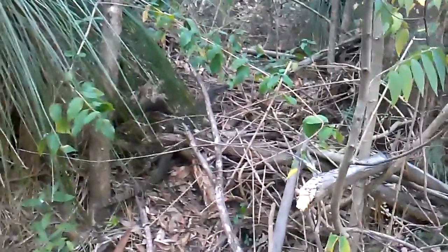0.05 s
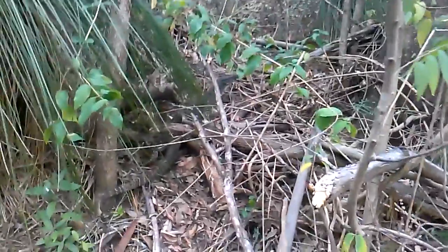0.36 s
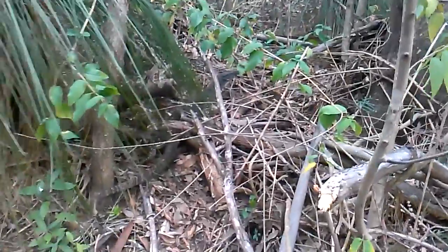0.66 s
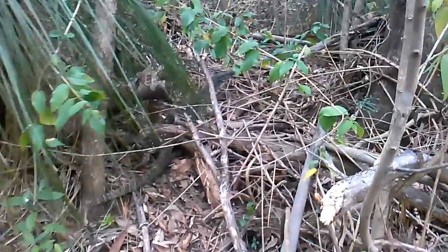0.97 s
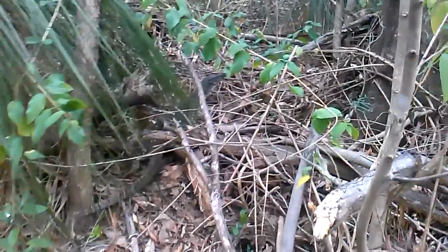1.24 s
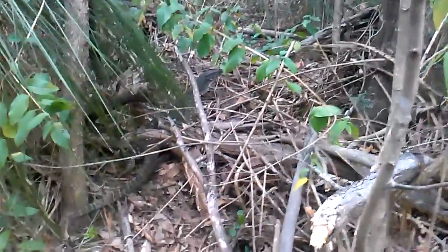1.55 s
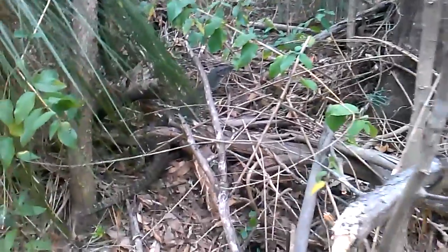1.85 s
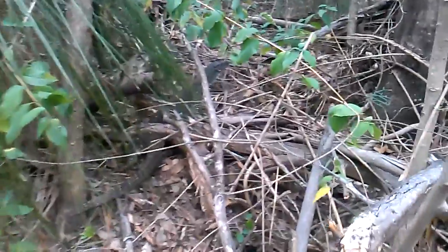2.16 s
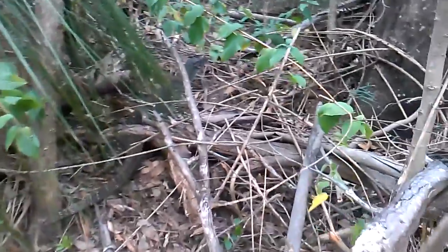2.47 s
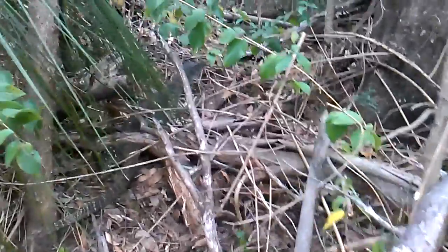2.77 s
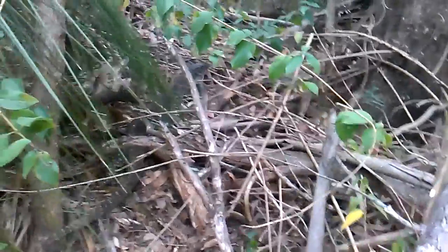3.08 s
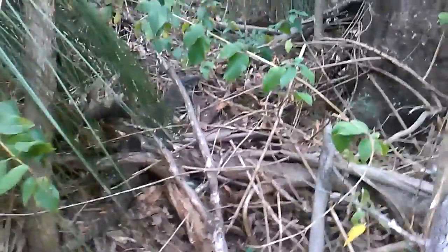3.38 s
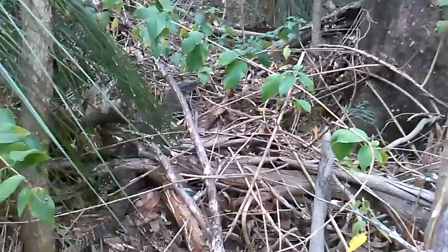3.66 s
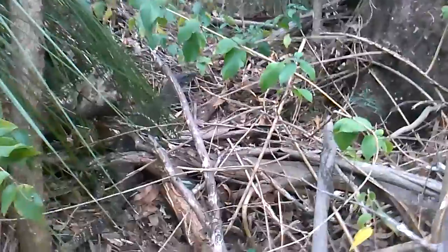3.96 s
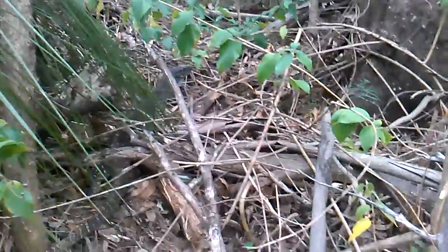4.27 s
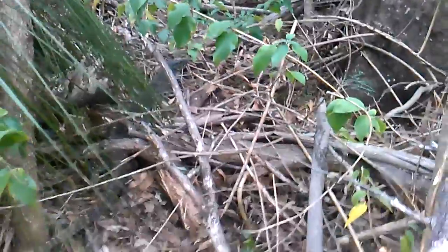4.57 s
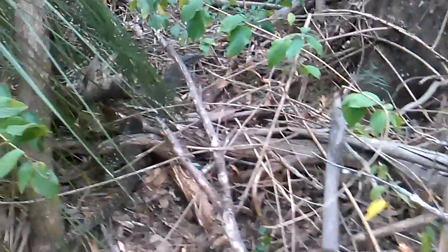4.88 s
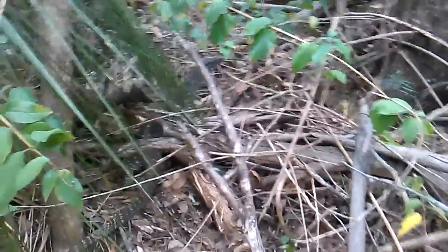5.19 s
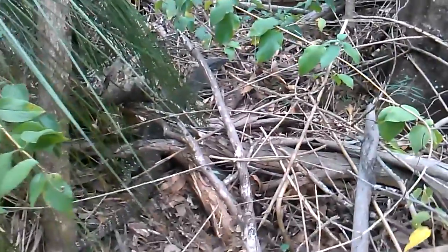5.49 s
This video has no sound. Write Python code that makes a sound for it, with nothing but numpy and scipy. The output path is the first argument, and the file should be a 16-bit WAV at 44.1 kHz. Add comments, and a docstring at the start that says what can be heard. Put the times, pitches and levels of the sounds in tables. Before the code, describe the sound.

An animal steps and scratches through dry forest litter, making crisp leaf crackles, small twig snaps and brief swishing scrapes. After one early rustle and a lull, the crackling grows busy, then gives way to two stronger raking strokes. Throughout, birds near and far repeat short, high pings on almost one pitch, echoing among the trees. A hand-held microphone adds a very faint low rumble.

```python
"""Dry leaves crackle and twigs snap as an animal steps and scratches through forest litter.
Each brittle fracture is an impulse that excites damped resonances, high in a leaf and low in a twig.
Birds, probably bell miners, ping on nearly one pitch, and reflections from the trunks prolong each call;
another bird squeaks twice. Air and handling rumble faintly on the hand-held microphone,
and a noise suppressor lowers the quiet gaps."""
import sys
import numpy as np
from scipy import signal
from scipy.fft import rfft, irfft, next_fast_len
from scipy.io import wavfile
from scipy.ndimage import uniform_filter1d

SR = 44100
rng = np.random.default_rng(int(sys.argv[2]) if len(sys.argv) > 2 else 0)


def to_wav(s):
    """Save 16-bit WAV."""
    ch = np.atleast_2d(s).T  # columns
    pcm = np.round(np.clip(ch, -1, 1) * 32767)  # PCM
    wavfile.write(sys.argv[1], SR, pcm.astype(np.int16))


N = 252693


# motion of the foot: t/s, raking share of the power (0 = separate crackles, 1 = one dense swish)
RAKE_SHARE = [(.45, 0.11), (.72, 0.69), (1.0, 0.27), (2.95, 0.056), (3.3, 0.61), (5.0, 0.95), (5.45, 0.6)]
# filters for trodden leaves, raked leaves and the twigs below: f/Hz, gain/dB
CRACKLE_SPECTRUM = [(400, -44), (1500, -17.5), (3500, -4.5), (5400, -3.5), (6800, -10), (8200, 1.5),
                    (9500, -11), (11200, -5.5), (13500, -8), (16000, -16.5)]
SWISH_SPECTRUM = [(400, -38), (1500, -14.5), (2600, -22), (3700, -7), (5200, -10), (6200, -2), (7500, -3),
                  (9200, -13), (11200, -14.5), (13500, -9.5), (16000, -15.5)]
TWIG_SPECTRUM = [(80, -31), (230, -6.5), (800, -1), (1700, -3), (2600, -8.5), (4000, -15), (9000, -32)]

def litter():
    """Superposition of impulses: treading cracks single leaves, raking slides hundreds, twigs creak."""
    leaf_gain, twig_gain = rustle_gains()
    rake = curve(RAKE_SHARE)
    clumps = amp(2.3 * wander(N, rate_hz=49))  # leaves give way in bunches
    crackle = fractures(per_s=1700, spread_db=7, low_hz=2800, high_hz=13100, q=1.7, tear_s=0.00079)
    swish = fractures(per_s=3800, spread_db=3.5, low_hz=2760, high_hz=14700, q=1.7, tear_s=0.0012)
    twigs = fractures(per_s=800, spread_db=6, low_hz=194, high_hz=2680, q=2.4, tear_s=0.0021)
    crackle = scatter(colour(crackle, CRACKLE_SPECTRUM) * clumps, wet_db=-6.5, t60=0.068)
    swish = colour(swish, SWISH_SPECTRUM) * clumps
    twigs = scatter(colour(twigs, TWIG_SPECTRUM) * clumps, wet_db=-3, t60=0.27)
    leaves = np.sqrt(1 - rake) * steady(crackle) + np.sqrt(rake) * steady(swish)
    return leaf_gain * leaves + twig_gain * steady(twigs)


# steps and scrapes, and two stretches of faint hiss that swell with the bird calls (0.477 s, 1.223 s):
# t/s, rise/s, hold/s, leaf level/dB, twig level re leaves/dB
RUSTLE_SWELLS = [(0.068, 0.078, 0.23, -60.5, -9), (0.477, 0.032, 0.23, -56.5, -12.5),
                 (0.658, 0.062, 0.046, -31.5, -17.5), (0.784, 0.024, 0.12, -44, -4),
                 (0.956, 0.045, 0.0077, -54.5, 2.5), (1.064, 0.014, 0.0076, -52, 1),
                 (1.223, 0.013, 0.52, -62, -3), (1.616, 0.16, 0.0053, -49.5, -11),
                 (1.996, 0.086, 0.014, -38, -14.5), (2.143, 0.044, 0.15, -42.5, -11),
                 (2.346, 0.019, 0.29, -32.5, -14), (2.676, 0.019, 0.26, -33, -15.5),
                 (3.017, 0.026, 0.067, -43, -15), (3.127, 0.027, 0.016, -36, -18.5),
                 (3.595, 0.031, 0.11, -28, -13), (3.662, 0.034, 0.041, -27, -14.5),
                 (3.736, 0.067, 0.019, -22, -14.5), (3.856, 0.041, 0.042, -39.5, -15),
                 (4.169, 0.019, 0.12, -48.5, -17), (4.514, 0.046, 0.03, -40, -16),
                 (4.594, 0.089, 0.052, -30.5, -16), (4.742, 0.085, 0.13, -34.5, -18),
                 (4.961, 0.054, 0.065, -24.5, -12), (5.116, 0.018, 0.11, -47.5, -15),
                 (5.367, 0.013, 0.29, -39.5, -11)]
# faint rustle between the steps: t/s, leaf level/dB
RESTING_RUSTLE = [(0, -67), (.45, -101), (1.2, -80.5), (1.8, -66.5), (3.3, -53.5), (4.45, -63.5),
                  (5.73, -65)]

def rustle_gains():
    """Incoherent addition: overlapping swells sum in power. Returns the gains of leaves and twigs."""
    t = np.arange(SR) / SR
    leaf_power = amp(curve(RESTING_RUSTLE)) ** 2
    twig_power = leaf_power * amp(-11) ** 2
    for start, rise, hold, leaf_db, twig_db in RUSTLE_SWELLS:
        gain = swell_envelope(t, rise, hold)
        add(leaf_power, start, (amp(leaf_db) * gain) ** 2)
        add(twig_power, start, (amp(leaf_db + twig_db) * gain) ** 2)
    return np.sqrt(leaf_power), np.sqrt(twig_power)


def swell_envelope(t, rise, hold, swell_db=12.5, release_db_per_s=282, settle_db_per_s=67.5):
    """Exponential growth and decay: in a step, the weight comes down, holds and lifts."""
    swell = amp(swell_db * (np.clip(t / rise, 0, 1) - 1)) * np.clip(t / 0.02, 0, 1)
    released_s = np.maximum(t - rise - hold, 0)
    settling_db = -19 - settle_db_per_s * released_s  # after a step, bent leaves go on springing back
    return swell * amp(np.maximum(-release_db_per_s * released_s, settling_db))


def fractures(per_s, spread_db, low_hz, high_hz, q, tear_s, fragments=10):
    """Poisson process: tiny tears, most weak and a few strong, each ring one resonant fragment."""
    onsets = rng.random(N) < per_s / SR
    clicks = onsets * amp(spread_db * np.minimum(rng.exponential(1, N), 3.5))
    fragment = rng.integers(0, fragments, N)
    fibres, out = rng.standard_normal(N), np.zeros(N)
    decay = np.exp(-1 / (tear_s * SR))
    for k, hz in enumerate(np.linspace(low_hz, high_hz, fragments)):
        tears = signal.lfilter([1], [1, -decay], clicks * (fragment == k) + 1e-12)
        out += ring(tears * fibres, hz, width_hz=hz / q) * np.sqrt(hz / q)
    return out


# the clearest breaks of leaves and twigs: t/s, relative crack level/dB, relative knock level/dB
BREAKS = [(0.164, -35, -56), (0.272, -49, -39.5), (.303, -34.5, -42.5), (0.3624, -44, -36),
          (0.787, -24, -36.5), (0.847, -16.5, -60), (0.886, -35, -34), (.907, -23, -36.5),
          (1.001, -35, -48), (1.0723, -45, -39), (1.094, -38, -68), (1.627, -40, -65), (1.655, -47, -41),
          (1.769, -26.5, -53), (1.863, -39.5, -75), (2.01, -32, -52), (2.060, -24.5, -38),
          (2.068, -18.5, -33.5), (2.088, -20.5, -31), (2.227, -29, -45), (2.343, -25, -40),
          (2.37, -25, -26.5), (2.373, -29, -32), (2.385, -15, -25), (2.405, -12, -31), (2.478, -18, -30.5),
          (2.489, -21, -43), (2.499, -19.5, -34), (2.537, -39, -30), (2.555, -25, -47), (2.599, -27.5, -48),
          (2.628, -29, -28), (2.704, -23, -38), (2.71, -20, -30.5), (2.718, -28, -37), (2.774, -17, -30.5),
          (2.8085, -16.5, -32), (2.814, -18.5, -32), (2.894, -17, -28), (2.913, -22.5, -49),
          (2.938, -21.5, -54), (2.947, -18.5, -28.5), (3.018, -43, -34.5), (3.108, -27.5, -54),
          (3.427, -30, -52), (3.656, -29, -26.5), (3.741, -16, -27.5), (3.773, -17, -46), (3.807, -19, -41),
          (3.905, -24.5, -38.5), (3.928, -25.5, -33.5), (4.086, -33, -69), (4.262, -37, -57),
          (4.557, -27.5, -46), (5.035, -19, -25), (5.067, -25, -38), (5.12, -28, -35), (5.172, -23.5, -47),
          (5.479, -26, -43), (5.503, -33, -44), (5.525, -33, -42.5)]
# resonance of what breaks, high for thin leaves and lower for thicker stuff: t/s, f/Hz
CRACK_RESONANCE = [(2.35, 8200), (2.75, 4750), (3.1, 5750), (5.2, 8200)]
# modes of a knocked twig and the ground under it: f/Hz, bandwidth/Hz, relative level/dB
WOOD_MODES = [(334, 350, -7), (960, 300, -1.5), (1525, 240, 3.5)]
LEAF_TEAR_S, LEAF_HZ = 0.00064, 8200  # decay time of a thin leaf's tear, and its resonance

def snaps(size=1200):
    """Impulse excitation of modes: tearing fibres ring a leaf high and briefly, a twig low and hollow."""
    t, out = np.arange(size) / SR, np.zeros(N)
    for start, crack_db, knock_db in BREAKS:
        fibres, wood = rng.standard_normal((2, size))
        leaf_size, twig_size = rng.standard_normal(2)
        hz = np.interp(start, *np.transpose(CRACK_RESONANCE)) * np.exp(-0.04 * leaf_size)
        tear_s = LEAF_TEAR_S * (LEAF_HZ / hz) ** 2  # lower-ringing stuff tears longer
        burst = np.diff(fibres * np.exp(-t / tear_s), prepend=0)
        crack = unit(ring(burst, hz, width_hz=770))
        crack += 0.5 * unit(ring(burst, 13600, width_hz=9200))
        crack += 0.44 * unit(ring(burst, 4450, width_hz=1200))
        push = (t == 0) + 0.14 * wood * np.exp(-t / 0.002)
        knock = sum(amp(db) * unit(ring(push, mode_hz * np.exp(-0.12 * twig_size), width_hz))
                    for mode_hz, width_hz, db in WOOD_MODES)
        add(out, start, amp(crack_db - 13) * unit(crack) + amp(knock_db - 12.5) * unit(knock))
    return scatter(out, wet_db=-8.5, t60=0.13)


def scatter(x, wet_db, t60, size=6000, count=5):
    """Early reflections: ground and stems return a short smear by paths that shift as the animal moves."""
    t = np.arange(size) / SR
    tails = rng.standard_normal((count, size)) * amp(-60 * t / t60) * (t > 0.001)
    weights = np.array([wander(N, rate_hz=21) for _ in tails])
    weights /= np.linalg.norm(weights, axis=0)
    echoes = sum(signal.oaconvolve(x * weight, tail / np.linalg.norm(tail))[:N]
                 for weight, tail in zip(weights, tails))
    return x + amp(wet_db) * echoes


# near calls: t/s, level/dB, starting f/Hz, fall/Hz, rasp share (0-1), upward reach of the rasp/Hz,
# relative level of the second harmonic/dB and of the third/dB
NEAR_CHIRPS = [(0.478, -34, 2870, 20.5, 0.14, 247, -26, -13), (.560, -22, 2889, 30, 0.2, 420, -15, -15.5),
               (1.272, -25.5, 2835, 19, 0.53, 112, -23, -19.5),
               (2.019, -28.5, 2983, 38, 0.22, 515, -23, -15.5),
               (2.054, -20.5, 2973, 162, 0.08, 165, -23.5, -20.5),
               (5.461, -39, 2945, 94, 0.53, 154, -33, -36)]
# pure pings: far calls, and the ringing echo of a near call (0.77 s): t/s, level/dB, f/Hz
PURE_PINGS = [(.092, -60, 2815), (.77, -44, 2860), (1.472, -39, 2840), (1.68, -46, 2890),
              (1.98, -41.5, 2965), (2.175, -36, 2850), (2.452, -31.5, 2870), (2.58, -42, 2865),
              (2.895, -41, 2860), (3.44, -47, 2845), (3.46, -48, 2915), (3.88, -48, 2850),
              (4.025, -50, 2828), (4.18, -55, 2835), (4.272, -49, 2950), (4.365, -52, 2855),
              (4.476, -37.5, 2865), (5.52, -45, 2885), (5.62, -48, 2870)]
# thin rising calls of another bird: t/s, duration/s, level/dB, first f/Hz, last f/Hz
RISING_SQUEAKS = [(0.603, 0.039, -49, 1390, 1800), (4.275, 0.07, -55.5, 595, 721)]

def birds():
    """Direct and reverberant sound: the pings carry a larger share of forest echo than the near calls."""
    near, pings = np.zeros((2, N))
    for start, *call in NEAR_CHIRPS:
        add(near, start, chirp(*call))
    for start, *tone in PURE_PINGS:
        add(pings, start, ping(*tone))
    for start, *call in RISING_SQUEAKS:
        add(near, start, squeak(*call))
    return forest(near, wet_db=-7.5) + forest(pings, wet_db=-3.5)


def chirp(level_db, first_hz, fall_hz, rasp_share, reach_hz, second_db, third_db, size=8192):
    """Beating of two voices: one holds a clean sagging note, the other rasps down near it and clears."""
    length_s, waver_hz, beat_hz = 0.0701, 15.5, 91.2
    progress = np.linspace(0, 1, int(length_s * SR))
    low_hz = first_hz - fall_hz * progress + waver_hz * wander(size, rate_hz=133)[:len(progress)]
    high_hz = low_hz + beat_hz + reach_hz * (1 - progress) ** 4
    low, high = phasor(low_hz), phasor(high_hz)
    roughness = (1 - progress) * flutter(size, rate_hz=150)[:len(progress)]
    clean, rasp = 1 - rasp_share, rasp_share * (roughness + np.sqrt(progress))
    swell = abs(np.sin(np.pi * progress))
    fundamentals = clean * low * swell + rasp * high * swell ** 0.62
    overtones = sum(amp(db) * (clean * low ** k + rasp * high ** k)
                    for k, db in [(2, second_db), (3, third_db)])
    brightness = np.sqrt(1 - progress)
    return amp(level_db) * np.sqrt(2) * (fundamentals + overtones * swell * brightness).real


def ping(level_db, hz, length_s=0.071, fall_hz=31.8, size=8192):
    """Multipath fading: of a far call or an echo, only the fundamental arrives, wavering through foliage."""
    progress = np.linspace(0, 1, int(length_s * SR))
    fading = 1 + 0.4 * flutter(size, rate_hz=55)[:len(progress)]
    note = phasor(hz + fall_hz * (0.5 - progress))
    swell = abs(np.sin(np.pi * progress)) ** 0.36
    return amp(level_db) * unit((note * fading).real) * swell


def squeak(length_s, level_db, first_hz, last_hz, formant_hz=4280, jitter=0.006):
    """Formant filtering: of a scratchy upward glide, only the harmonics near one resonance carry."""
    count = int(length_s * SR)
    hz = np.linspace(first_hz, last_hz, count) * (1 + jitter * wander(count, rate_hz=300))
    phase = 2 * np.pi * np.cumsum(hz) / SR
    voice = sum(np.sin(k * phase) / k / (1 + (2 * np.log2(k * hz / formant_hz)) ** 4)
                for k in range(1, 12))
    return amp(level_db) * unit(voice * np.hanning(count))


# reverberation time among the trees: f/Hz, T60/s
REVERB_TIME = [(2900, 0.93), (12000, 0.29)]

def forest(x, wet_db):
    """Reverberation: echoes from trunks and foliage shimmer as each band decays at its own rate."""
    reflections = rng.standard_normal(SR) * (rng.random(SR) < 2500 / SR)
    reflections *= np.arange(SR) > 0.012 * SR
    hz, t, bands = signal.stft(reflections, SR, nperseg=256)
    bands *= (hz[:, None] / 2900) ** 1.86  # leaves throw back short waves best
    bands *= amp(-60 * t / at_frequency(REVERB_TIME, hz)[:, None])
    tail = signal.istft(bands, SR, nperseg=256)[1]
    power = abs(rfft(tail, SR)) ** 2
    gain_at_pings = np.sqrt(power[2780:2980].mean())  # bins of 1 Hz
    echoes = signal.fftconvolve(x, tail)[:N] / gain_at_pings
    shimmer = 0.85 + 0.5 * flutter(N, rate_hz=40)
    return x + amp(wet_db) * (signal.hilbert(echoes, next_fast_len(N))[:N] * shimmer).real


# handling noise: f/Hz, relative level/dB
HANDLING_SPECTRUM = [(30, 0.5), (65, -8), (200, -16.5), (500, -25), (3000, -48.5)]
# puffs of air on the microphone: t/s, duration/s, level/dB
AIR_PUFFS = [(3.342, 0.33, -39.5), (4.132, 0.12, -41.5)]

def rumble():
    """Low-frequency noise: uneven handling and the eddies of two soft puffs of air on the microphone."""
    handling_db = -51.5 + 0.87 * wander(N, rate_hz=25)
    out = amp(handling_db) * unit(colour(rng.standard_normal(N), HANDLING_SPECTRUM))
    eddies = ring(rng.standard_normal(N), 28, width_hz=18)
    eddies = signal.sosfilt(signal.butter(2, 70, fs=SR, output="sos"), eddies)
    for start, length_s, db in AIR_PUFFS:
        count = int(length_s * SR)
        puff = eddies[int(start) * SR:][:count] * np.hanning(count)
        add(out, start, amp(db) * unit(puff))
    return out


def colour(x, spectrum, size=4096):
    """Minimum-phase filtering: shapes the spectrum causally, so clicks keep their sharp fronts."""
    hz = abs(np.fft.fftfreq(size, 1 / SR))
    log_gain = np.log(amp(at_frequency(spectrum, hz)))
    taps = np.fft.ifft(np.exp(np.conj(signal.hilbert(log_gain)))).real
    return signal.oaconvolve(x, taps[:size // 2])[:len(x)]


def ring(x, hz, width_hz):
    """Damped resonance of one mode driven by x."""
    r = np.exp(-np.pi * width_hz / SR)
    return signal.lfilter([1, 0, -1], [1, -2 * r * np.cos(2 * np.pi * hz / SR), r * r], x)


def phasor(hz):
    """Complex tone whose phase is the integral of frequency."""
    return np.exp(2j * np.pi * np.cumsum(hz) / SR)


def wander(count, rate_hz, step=16):
    """Low-pass noise: smooth random motion of rms 1."""
    size = next_fast_len(count // step + 2)
    hz = np.fft.rfftfreq(size, step / SR)
    slow = irfft(rfft(rng.standard_normal(size)) / (1 + (hz / rate_hz) ** 4), size)
    return unit(np.interp(np.arange(count) / step, np.arange(size), slow))


def flutter(count, rate_hz):
    """Rayleigh fading: random amplitude and phase, of rms 1."""
    return (wander(count, rate_hz) + 1j * wander(count, rate_hz)) / np.sqrt(2)


def steady(x, window_s=0.057):
    """Running normalisation: holds the rms near 1 over the length of a foot stroke."""
    power = abs(uniform_filter1d(x ** 2, int(window_s * SR)))
    return x / np.sqrt(power + 0.01 * np.mean(x ** 2))


def unit(x):
    """Normalisation to rms 1."""
    return x / np.sqrt(np.mean(x ** 2) + 1e-20)


def amp(db):
    """Amplitude ratio of a level in decibels."""
    return 10 ** (np.asarray(db) / 20)


def at_frequency(table, hz):
    """Interpolation on a log-frequency axis."""
    f, value = np.transpose(table)
    return np.interp(np.log(hz + 1), np.log(f + 1), value)


def curve(table):
    """Linear interpolation in time, sample by sample."""
    return np.interp(np.arange(N) / SR, *np.transpose(table))


def add(mix, start_s, sound):
    """Superposition of a delayed sound on the mix."""
    part = mix[round(start_s * SR):][:len(sound)]
    part += sound[:len(part)]


def scene():
    """Linear superposition of litter, snaps, birds and rumble in one channel."""
    return (litter() + snaps() + birds() + rumble())[None]


def record(dry, cutoff_hz=16000):
    """Downward expansion: as the treble fades, a suppressor lowers the bass, then all; a low-pass follows."""
    bass = signal.sosfiltfilt(signal.butter(2, 600, fs=SR, output="sos"), dry[0])
    treble = dry[0] - bass
    treble_db = 10 * np.log10(abs(uniform_filter1d(treble ** 2, 1500)) + 1e-12)
    bass_gain = amp(np.clip(0.8 * (treble_db + 44), -20, 0))
    gap_gain = amp(np.clip(treble_db + 58, -5, 0))
    out = (treble + bass * bass_gain) * gap_gain
    lowpass = signal.firwin(255, cutoff_hz, window=("kaiser", 8), fs=SR)
    return signal.oaconvolve(out, lowpass, "same")[None]


dry = scene()
out = record(dry)
to_wav(out)
```